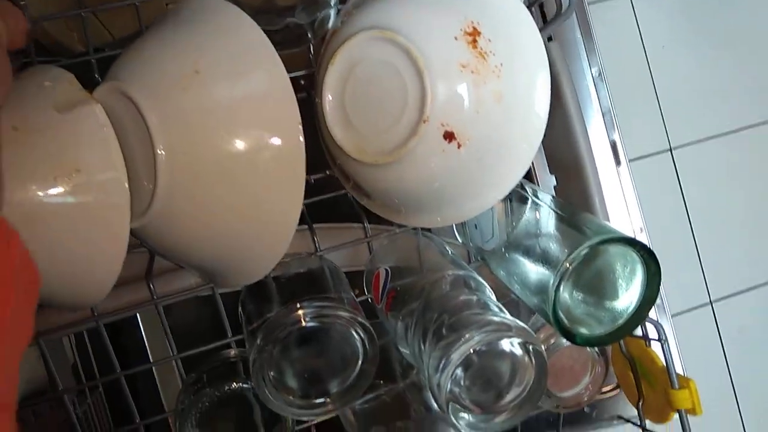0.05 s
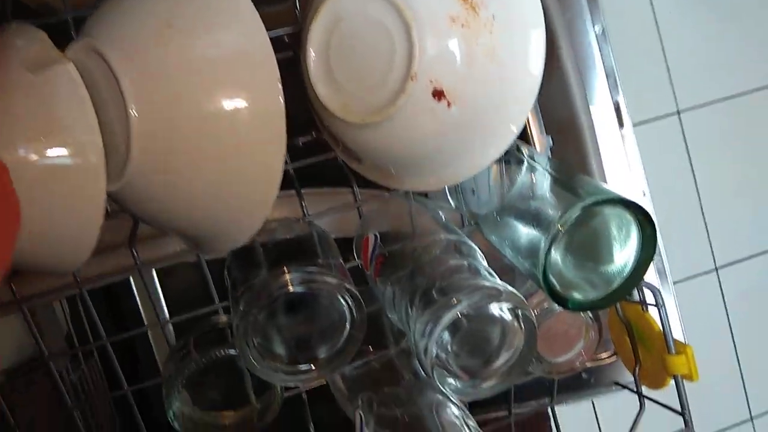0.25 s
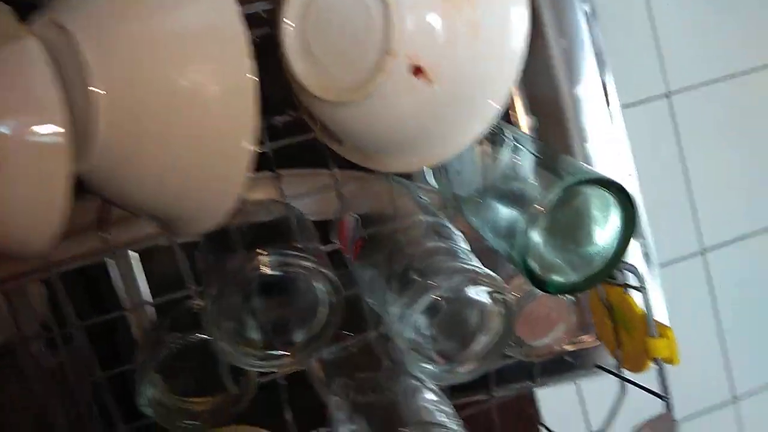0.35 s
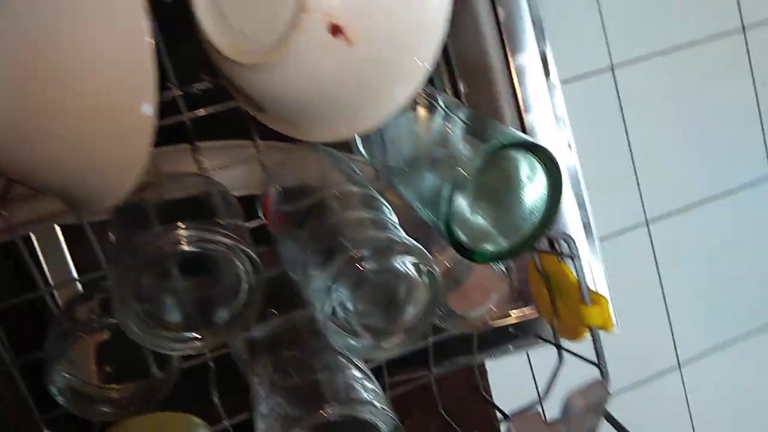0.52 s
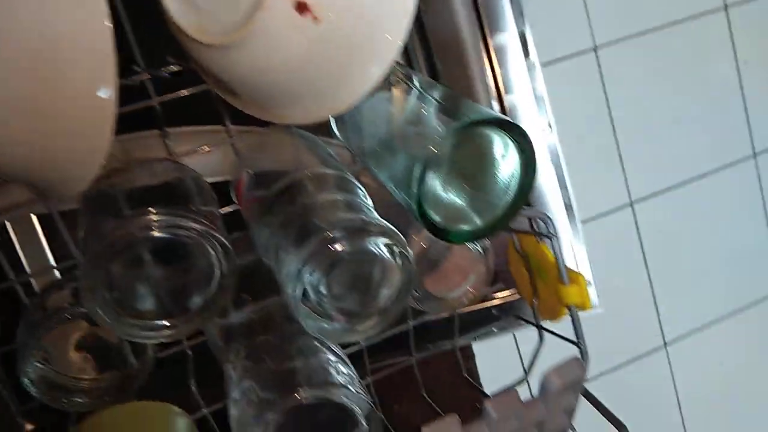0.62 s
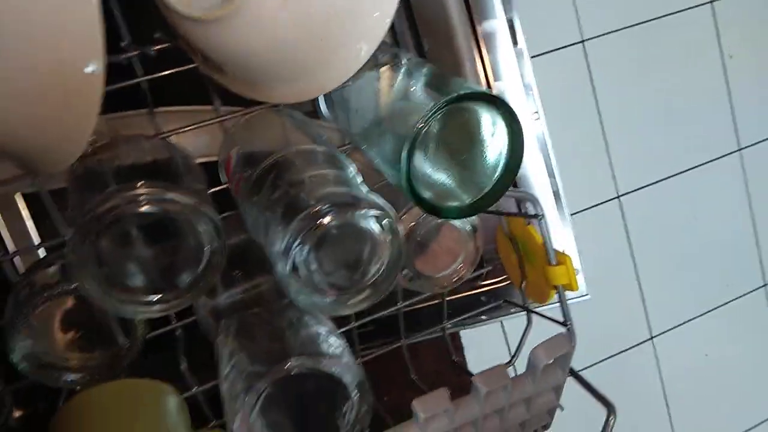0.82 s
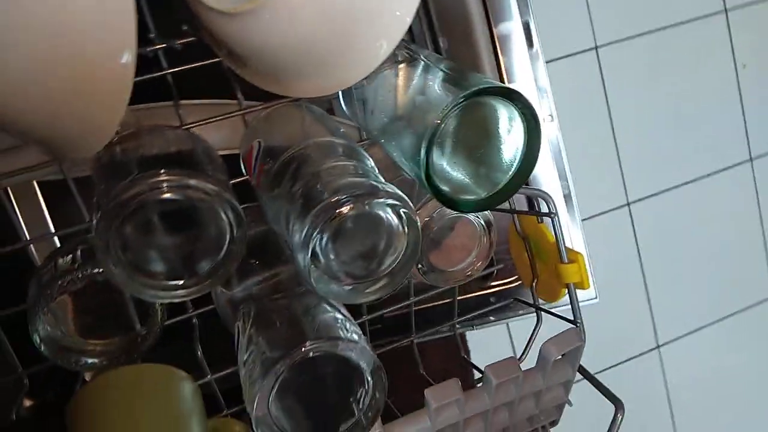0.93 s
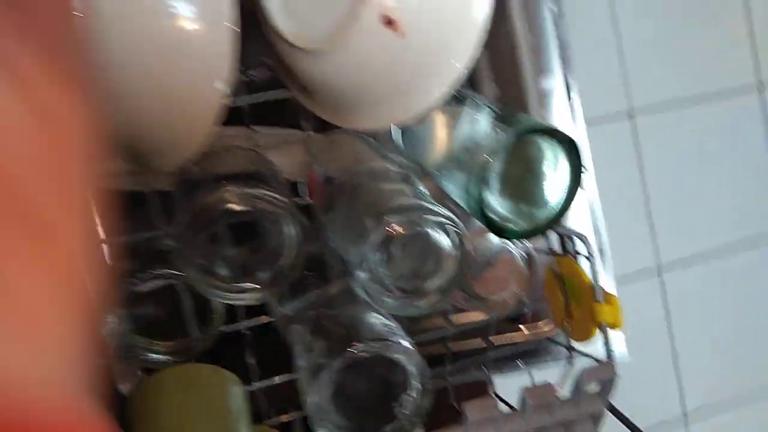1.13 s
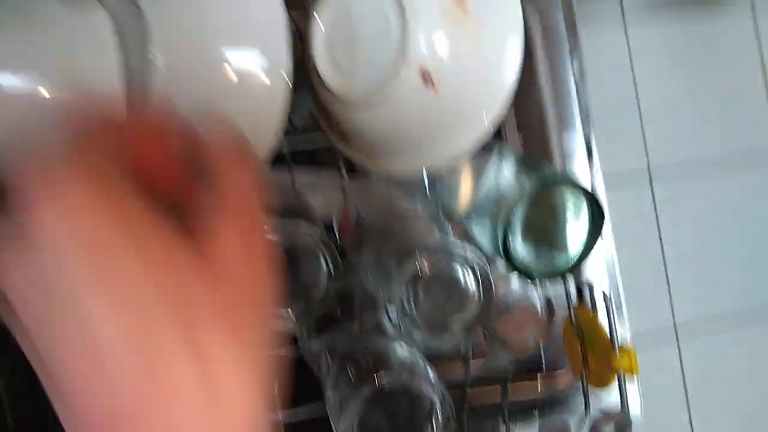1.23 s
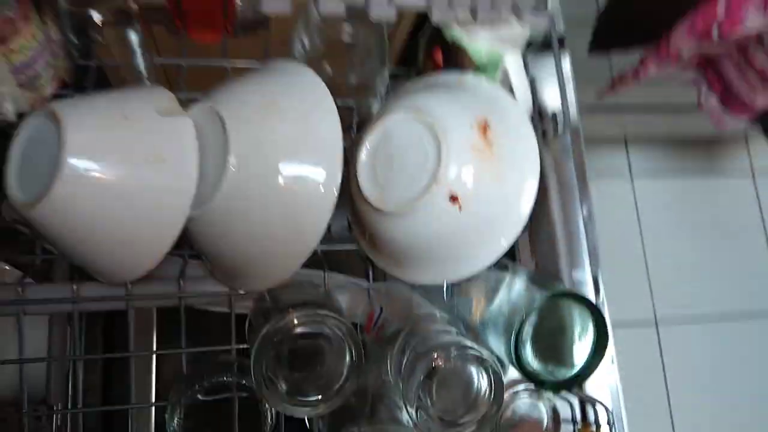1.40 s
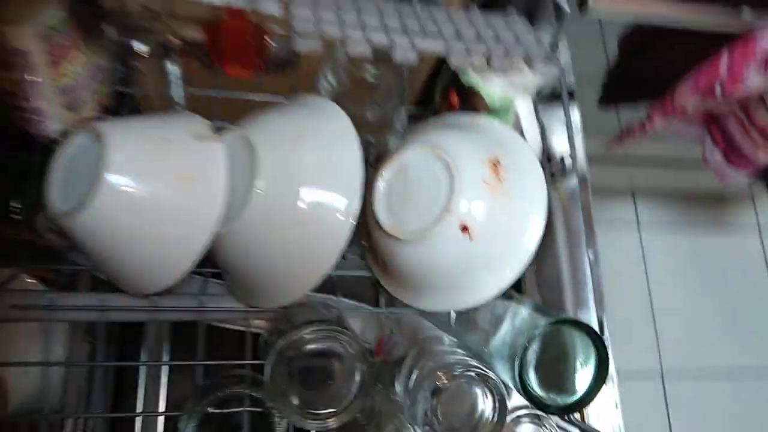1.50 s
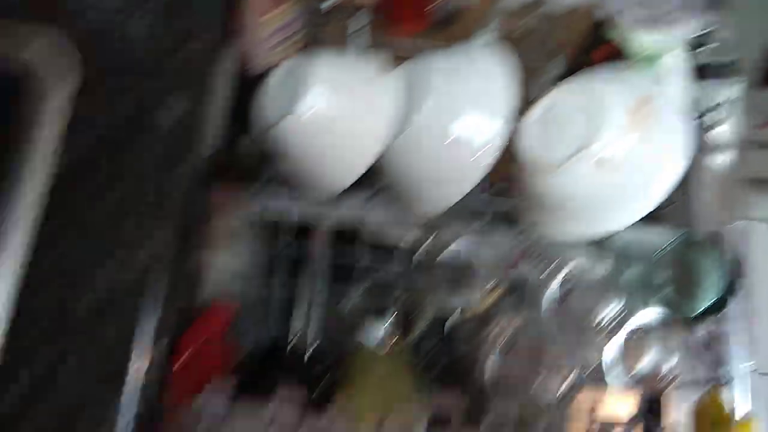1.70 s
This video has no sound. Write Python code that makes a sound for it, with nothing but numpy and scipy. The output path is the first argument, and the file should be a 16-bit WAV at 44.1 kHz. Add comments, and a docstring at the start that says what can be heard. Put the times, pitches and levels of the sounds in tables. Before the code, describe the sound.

Glasses and dishes clink close by in a dishwasher rack that scrapes along its rails from the start. A light clink comes at 0.2 seconds and a bright ringing one near 0.4. From 0.5 to 0.7 the rack jolts home with hollow thuds and loud, rattling clinks, with a small rebound at 0.8. Soft bumps follow from 1.0 and a faint tick at 1.4, over low kitchen hum.

```python
"""Dishwasher rack pushed home.

A loaded rack scrapes along its rails, close by in a tiled kitchen. Glasses and a bowl clink
together and ring; the rack jolts home, booms in the tub and rattles the rest of the load.
A few soft bumps and one small tick follow over the low hum of the room."""
import sys
import numpy as np
from scipy import signal
from scipy.fft import rfft, irfft
from scipy.io import wavfile

SR = 44100
rng = np.random.default_rng(int(sys.argv[2]) if len(sys.argv) > 2 else 0)


def dump(signal):
    """Clip the signal to [-1, 1] and save it as 16-bit WAV at the path in sys.argv[1]."""
    limited = np.clip(np.atleast_2d(signal).T, -1, 1)
    pcm = np.round(limited * 32767).astype(np.int16)
    wavfile.write(sys.argv[1], SR, pcm)


N = 77175
T, HZ = np.arange(N) / SR, np.fft.rfftfreq(N, 1 / SR)
RIPPLE_PEAK_DB = 8  # the load's many small resonances

# stereo balance: (frequency [Hz], left minus right [dB])
BALANCE = [(200, 0.5), (900, 0), (1500, 4), (3000, 6), (5200, 1.5), (7500, -3.5), (8900, -7.5), (11500, 1),
           (15000, 3)]
# stereo likeness: (frequency [Hz], left-right correlation [1])
CORRELATION = [(120, 0.97), (300, 0.99), (700, 0.82), (1500, .1), (15000, .1)]
# tall glass: (frequency [Hz], level [dB], t60 [s])
TALL_GLASS_MODES = [(983.5, -25, 0.074), (1423, -20.5, 0.079), (1940, -28, 0.34), (2820, -11, 0.032),
                    (3299, -10.5, 0.097), (3400, -18.5, 0.044), (4933, -15.5, .18), (5740, -15.5, 0.16),
                    (8802, -12, .12), (9140, -20.5, .14), (10720, -30, .14), (11600, -20.5, 0.093),
                    (12200, -26.5, 0.14), (13350, -15, 0.094), (15650, -29, .13)]
# dry contact crack: (frequency [Hz], relative density [dB])
CRACK_SPECTRUM = [(200, -20.5), (1000, -3.5), (3000, 0.5), (7000, -4), (11000, -11), (16000, -22.5)]


def amp(db):
    """Decibels to gain."""
    return 10 ** (np.asarray(db) / 20)


def unit_rms(x):
    """Scale to rms 1."""
    return x / np.sqrt(np.mean(x ** 2) + 1e-20)


def lookup(table, hz):
    """Interpolate over log frequency."""
    table_hz, value = np.transpose(table)
    return np.interp(np.log(hz + 1), np.log(table_hz + 1), value)


def add(mix, start_s, sound):
    """Mix a sound in at start_s."""
    part = mix[:, max(round(start_s * SR), 0):]
    part += sound[:, :part.shape[1]]


def pan(balance_db):
    """Left and right gains."""
    return amp(np.array([[.5], [-.5]]) * balance_db)


def octaves(hz, pivot_hz):
    """Octaves above a pivot, finite at 0 Hz."""
    return np.log2((hz + 20) / pivot_hz)


def highpass(x, cutoff_hz, order):
    """Butterworth high-pass."""
    return signal.sosfilt(signal.butter(order, cutoff_hz, "highpass", fs=SR, output="sos"), x)


def envelope(rise_s, t60_s):
    """Linear rise, exponential decay."""
    return np.minimum(T / rise_s, 1) * np.exp(-np.log(1000) * np.minimum(T / t60_s, 10))


def noise(spectrum, tilt_db_oct=0, pivot_hz=4000, ripple_peak_db=0):
    """Coloured stereo noise at rms 1; ripple adds random resonances."""
    left, independent = rfft(rng.standard_normal((2, N)))
    correlation = np.clip(lookup(CORRELATION, HZ), -1, 1)
    right = correlation * left + np.sqrt(1 - correlation ** 2) * independent
    stereo = np.array([left, right]) * pan(lookup(BALANCE, HZ))
    knots_hz = 70 * np.arange(1024)
    ripple_db = ripple_peak_db * np.interp(HZ, knots_hz, rng.uniform(-2.2, 1, len(knots_hz)))
    shape_db = lookup(spectrum, HZ) + tilt_db_oct * octaves(HZ, pivot_hz) + ripple_db
    return unit_rms(irfft(stereo * amp(shape_db), N))


def ring(modes, tilt_db_oct=0, cluster_db=-7):
    """Struck piece: each decaying mode beats with a shorter-lived cluster of neighbours."""
    size, neighbours, rise_s = SR // 2, 14, .001806
    out, t, bin_hz = np.zeros((2, N)), T[:size], SR / size
    for hz, db, t60_s in modes:
        right_shift_rad = 1.725 * (1 - lookup(CORRELATION, hz))
        phase = 2 * np.pi * (hz * t + rng.random()) + np.array([[0], [right_shift_rad]])
        near_hz = hz + 100 * np.sqrt(hz / 4000) * rng.standard_normal(neighbours)
        near_bins = np.clip(near_hz / bin_hz, 1, size // 2).astype(int)
        lines = np.zeros((2, size // 2 + 1), complex)
        lines[:, near_bins] = np.exp(2j * np.pi * rng.random((2, neighbours)))
        cluster = amp(cluster_db + 2 * octaves(hz, 4000)) * unit_rms(irfft(lines, size)) / np.sqrt(2)
        decay = np.exp(-np.log(1000) * t / t60_s)
        gain = amp(db + tilt_db_oct * octaves(hz, 2700)) * pan(1.6 * lookup(BALANCE, hz))
        out[:, :size] += gain * (decay * np.sin(phase) + decay ** (1 / .7) * cluster)
    return out * np.minimum(T / rise_s, 1)


def kitchen(dry, wet_db):
    """Add early reflections from the tub and the tail of the tiled room."""
    # room decay: (frequency [Hz], t60 [s])
    room_t60 = [(100, .78), (400, .65), (1000, .62), (2500, .4), (5000, 0.38), (9000, 0.48), (15000, .35)]
    reflections, early_db, early_s, tail_rise_s = 12, -11.5, .018, .026
    hz, t, white = signal.stft(rng.standard_normal((2, SR)), SR, nperseg=256)
    decay = np.exp(-np.log(1000) * t / lookup(room_t60, hz)[:, None])
    response = signal.istft(white * decay, SR, nperseg=256)[1][:, :SR]
    response *= np.minimum(T[:SR] / tail_rise_s, 1)
    response *= amp(wet_db) / np.linalg.norm(response[0])
    for channel in response:
        delays = (rng.uniform(.1, 1, reflections) * early_s * SR).astype(int)
        channel[delays] += amp(early_db) * rng.choice([-1, 1], reflections) / np.sqrt(reflections)
    return dry + signal.fftconvolve(dry, response, axes=1)[:, :N]


def hum():
    """Steady low room noise."""
    # room hum: (frequency [Hz], relative density [dB])
    hum_spectrum = [(25, -33), (80, -22.5), (140, -7), (230, 6), (350, -7), (540, -1), (760, -31.5),
                    (1300, -27.5), (1600, -21), (1950, -32.5), (2500, -28.5), (3200, -53.5), (7500, -48),
                    (9700, -28), (16000, -49.5)]
    return amp(-56.5) * noise(hum_spectrum)


def tick():
    """One light, distant tap on crockery: a short ring and a click."""
    # crockery: (frequency [Hz], level [dB], t60 [s])
    crockery_modes = [(987, -54, 0.036), (2531, -33.5, 0.039)]
    # click: (frequency [Hz], relative density [dB])
    click_spectrum = [(400, -31), (1000, -8), (1600, -22), (2600, 1), (3600, -32), (5500, -31.5),
                      (6700, -15.5), (8000, -38), (16000, -57)]
    ringing = ring(crockery_modes, cluster_db=3)
    click = amp(-43) * noise(click_spectrum) * envelope(rise_s=.0012, t60_s=.11)
    out = np.zeros((2, N))
    add(out, start_s=1.434, sound=ringing + click)
    return out


def bumps():
    """Soft, low bumps after the rack is home."""
    # bumps: (time [s], level [dB], tilt [dB/octave])
    events = [(.986, -45.5, 4.5), (1.016, -53.5, -13), (1.191, -55, -4.5), (1.34, -41, 0),
              (1.385, -41, 1.5), (1.44, -54, 7)]
    # one bump: (frequency [Hz], relative density [dB])
    bump_spectrum = [(30, -39), (80, -29), (140, 0.5), (230, 5), (330, -1), (530, 3), (750, -21.5),
                     (2500, -43), (4000, -63), (16000, -90)]
    out = np.zeros((2, N))
    for start_s, db, tilt_db_oct in events:
        bump = noise(bump_spectrum, tilt_db_oct, pivot_hz=300) * envelope(rise_s=.0091, t60_s=.32)
        add(out, start_s, amp(db) * bump)
    return out


def slide():
    """Tiny slips of the moving rack rumble in the rails, ring its wires and buzz the tall glass."""
    # sliding: (time [s], wheel roll [dB], glass buzz [dB])
    levels = [(0, -37.5, -43), (0.068, -40.5, -50), (0.089, -41, -37), (0.156, -43, -43), (0.194, -54, -60),
              (.35, -52.5, -62), (.45, -44, -34.5), (.56, -48, -51), (.62, -38, -44.5), (0.701, -33, -52),
              (0.759, -47, -63.5), (0.918, -64, -90.5), (1.02, -60.5, -98), (1.2, -88, -101),
              (1.33, -68, -81), (1.47, -63, -87), (1.62, -83.5, -92)]
    # wheels on rails: (frequency [Hz], relative density [dB])
    roll_spectrum = [(60, -51), (220, -4), (450, -19.5), (720, 5), (950, 1), (1250, -14), (1800, -14),
                     (2500, 3.5), (3300, -23), (4000, -28.5), (8000, -50)]
    # steel wires: (frequency [Hz], level [dB], t60 [s])
    wire_modes = [(726, -3, 0.091), (817, -2.5, .13), (952, 0.5, 0.067), (1440, -6, 0.11),
                  (2166, -4, 0.073), (2474, -1.5, 0.078)]
    slips_per_s = 450
    onsets = rng.random(N) < slips_per_s / SR
    slip_db = np.minimum(rng.exponential(1, N), 3)
    slips = onsets * amp(slip_db) * rng.choice([-1, 1], N)
    slips = unit_rms(highpass(slips, cutoff_hz=220, order=2))
    rails = unit_rms(noise(roll_spectrum) * envelope(rise_s=.00032, t60_s=.021))
    wires = amp(1) * unit_rms(ring(wire_modes, cluster_db=-6))
    glass = ring(TALL_GLASS_MODES, cluster_db=-3) * envelope(rise_s=.00062, t60_s=.2)
    times_s, roll_db, buzz_db = np.transpose(levels)
    out = np.zeros((2, N))
    for db, body in [(roll_db, rails + wires), (buzz_db, glass)]:
        drive = slips * amp(np.interp(T, times_s, db))
        out += signal.fftconvolve(drive[None], unit_rms(body) / np.sqrt(N), axes=1)[:, :N]
    return out


def jolts():
    """The rack thuds on its rails; the tub booms and the wires rattle."""
    # jolts: (time [s], level [dB], thud tilt [dB/octave])
    events = [(0.366, -42.5, 1), (.490, -28.5, 7), (.504, -27, 4), (0.587, -26.5, -1), (.601, -26, -3.5),
              (0.639, -33.5, -4.5), (.677, -26.5, -4), (.796, -39.5, -3)]
    # thud in the tub: (frequency [Hz], relative density [dB])
    thud_spectrum = [(30, -37), (55, -25), (78, -35), (102, -6.5), (160, -10.5), (280, 2), (400, -5.5),
                     (600, -5.5), (950, 2), (1500, -25.5), (4000, -48), (16000, -76)]
    # hollow tub: (frequency [Hz], level [dB], t60 [s])
    tub_modes = [(207, -13, .2), (292, -11, .2)]
    out = np.zeros((2, N))
    for start_s, db, tilt_db_oct in events:
        thud = noise(thud_spectrum, tilt_db_oct, pivot_hz=300) * envelope(rise_s=.0055, t60_s=.2)
        boom = highpass(thud + amp(.5) * ring(tub_modes), cutoff_hz=95, order=3)
        wires = noise(CRACK_SPECTRUM, tilt_db_oct=-2, ripple_peak_db=RIPPLE_PEAK_DB)
        wires *= amp(4.5) * envelope(rise_s=.00068, t60_s=.093)
        add(out, start_s, amp(db) * (boom + wires))
    return out


def clinks():
    """Each knock cracks, rings the pieces that touch and shakes a clatter out of the load."""
    # knocks: (time [s], tall glass [dB], bowl [dB], small glass [dB], load [dB], tilt [dB/octave])
    knocks = [(0.2299, -15, -19.5, -48.5, -14, -0.5), (0.3666, 0.5, -27, -47.5, 1, 0.5),
              (.3815, -8, -29.5, -48, -11.5, -1.5), (0.4482, -17, -18, -48.5, -9.5, -1),
              (0.4896, -24.5, -20, -40, -3, -2), (0.5031, -23.5, -28, -41.5, -7, -4.5),
              (0.5819, -31.5, -17.5, -41.5, -2, 2.5), (.588, -23, -0.5, -27, 0, 1),
              (.618, -28, -30.5, -19, -14.5, 0.5), (.6373, -27.5, -15, -22.5, -6, 1),
              (.675, -31, -23, -20, -4.5, -0.5), (.694, -28, -19.5, -1.5, -1, 2),
              (.794, -39, -59, -28, -16.5, 1)]
    # bowl and two small glasses: (frequency [Hz], level [dB], t60 [s])
    bowl_modes = [(971, -19.5, 0.12), (1952, -16.5, 0.4), (3287, -14.5, .14), (5800, -7.5, 0.062),
                  (8900, -17.5, 0.095), (9170, -20.5, 0.098), (11500, -26, .13), (13490, -38.5, .2),
                  (15640, -33.5, .09)]
    small_glass_modes = [(2632, -6, 0.15), (2775, -18.5, 0.17), (3355, -24, .15), (4910, -7.5, .14),
                         (5179, -33, .33), (7435, -30, 0.16), (7543, -26, .22), (8780, -27.5, .2),
                         (8970, -12.5, 0.035), (10680, -17.5, .1), (12000, -30, .18), (12850, -28.5, .12),
                         (13900, -26.5, .15), (14920, -28.5, .12)]
    second_glass_modes = [(2670, -27, 0.11), (2843, -17.5, 0.024), (5175, -23.5, 0.062),
                          (8460, -31.5, 0.045)]
    # clattering load: (frequency [Hz], relative density [dB])
    clatter_spectrum = [(200, -41), (550, -7), (900, -3), (1700, -5.5), (3200, -2), (4200, -8.5),
                        (5000, -6.5), (5900, -5.5), (6600, -19.5), (8100, -23), (8900, -5), (10000, -14.5),
                        (11600, -10), (12700, -25), (13700, -16), (14700, -31.5), (15700, -23.5),
                        (16300, -49.5)]
    out = np.zeros((2, N))
    for start_s, tall_db, bowl_db, small_db, load_db, tilt_db_oct in knocks:
        pieces = [(tall_db, TALL_GLASS_MODES), (bowl_db, bowl_modes), (small_db, small_glass_modes)]
        ringing = sum(amp(db) * ring(modes, tilt_db_oct) for db, modes in pieces)
        clatter = noise(clatter_spectrum, tilt_db_oct, ripple_peak_db=RIPPLE_PEAK_DB)
        clatter *= amp(-17.5) * envelope(rise_s=.00077, t60_s=.125)
        crack = amp(-18.5) * noise(CRACK_SPECTRUM, tilt_db_oct) * envelope(rise_s=.0007, t60_s=.022)
        add(out, start_s, ringing + amp(load_db) * (clatter + crack))
    add(out, start_s=.7945, sound=ring(second_glass_modes))  # last rebound
    return out


def scene():
    """Close rack, more reverberant tick, room hum."""
    rack = clinks() + slide() + jolts() + bumps()
    return kitchen(rack, wet_db=-16) + kitchen(tick(), wet_db=-11.5) + hum()


def record(dry):
    """Round off the highest peaks, then low-pass."""
    ceiling, cutoff_hz = .88, 16500
    limited = dry / (1 + (dry / ceiling) ** 4) ** (1 / 4)
    lowpass = signal.firwin(301, cutoff_hz, window=("kaiser", 9), fs=SR)
    return signal.oaconvolve(limited, lowpass[None], "same")


dry = scene()
out = record(dry)
dump(out)
```